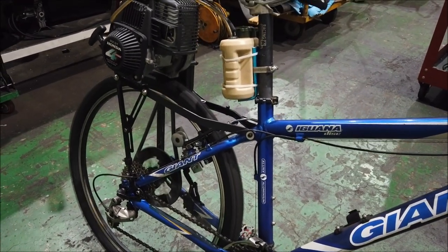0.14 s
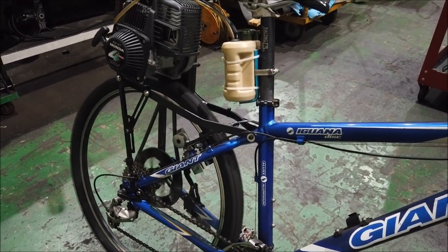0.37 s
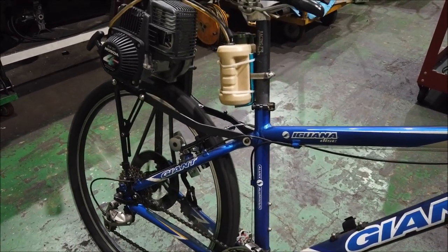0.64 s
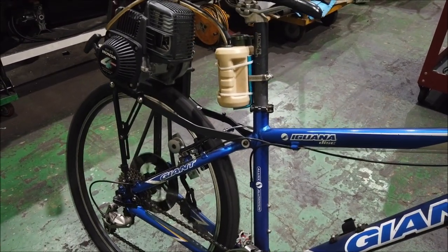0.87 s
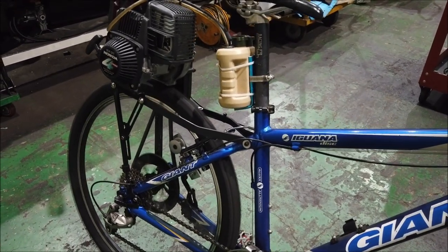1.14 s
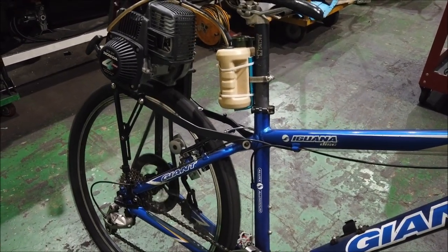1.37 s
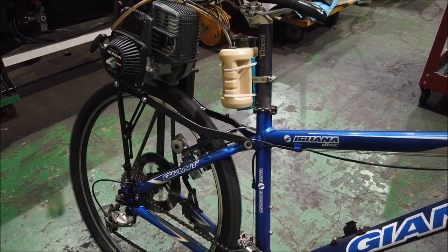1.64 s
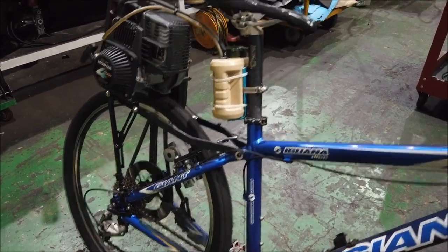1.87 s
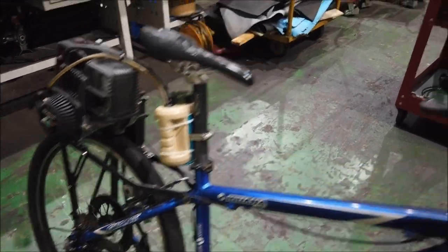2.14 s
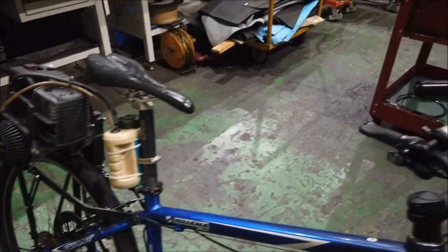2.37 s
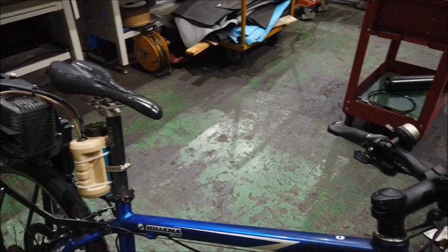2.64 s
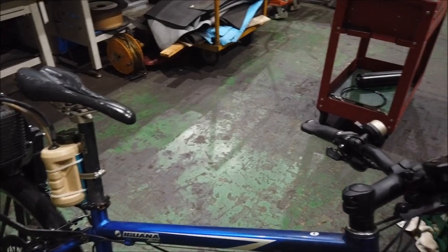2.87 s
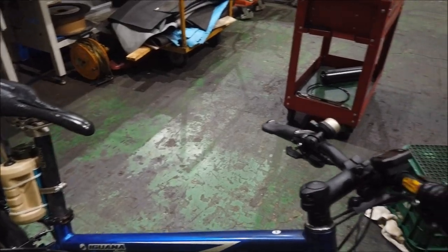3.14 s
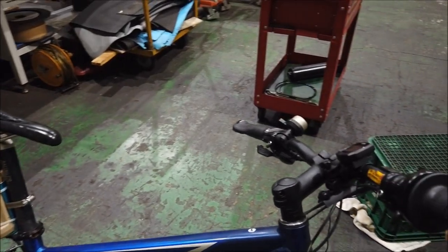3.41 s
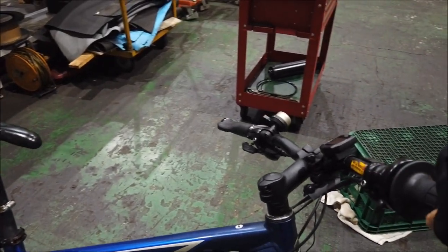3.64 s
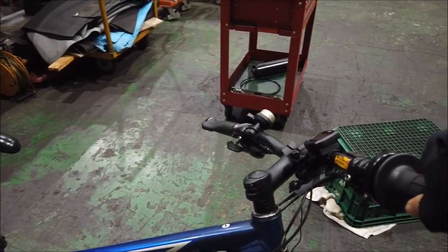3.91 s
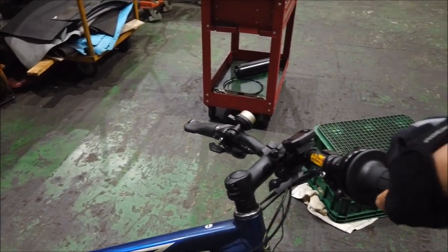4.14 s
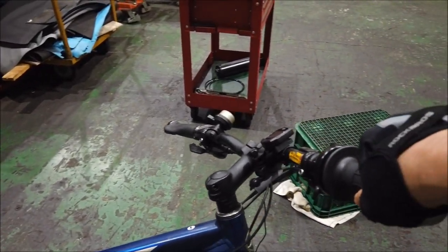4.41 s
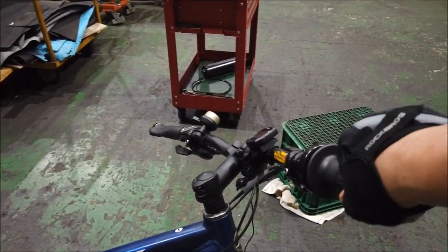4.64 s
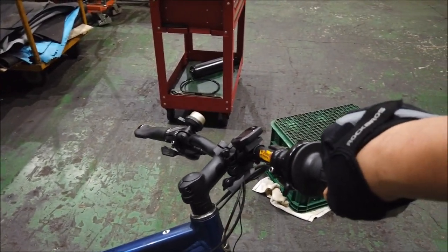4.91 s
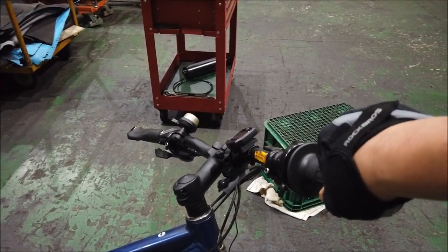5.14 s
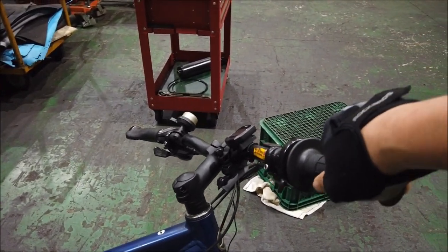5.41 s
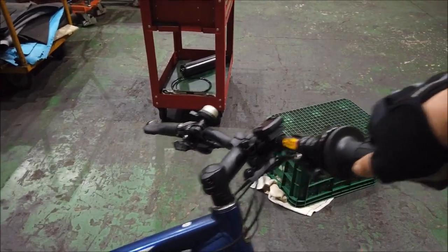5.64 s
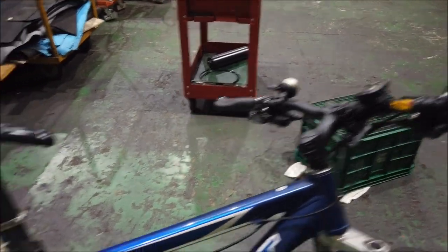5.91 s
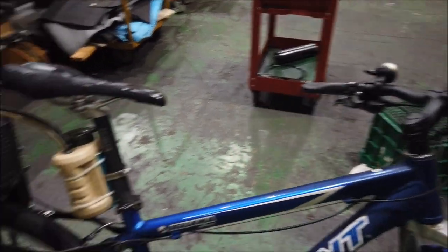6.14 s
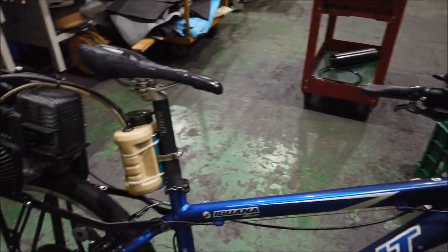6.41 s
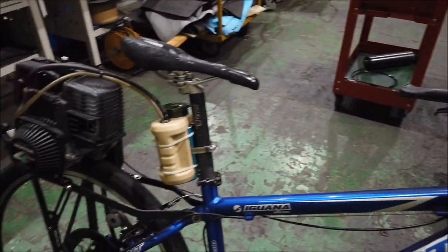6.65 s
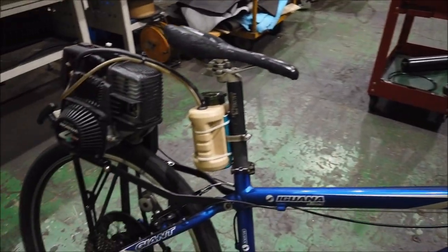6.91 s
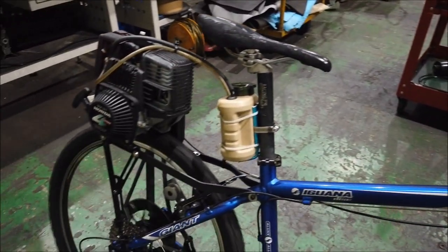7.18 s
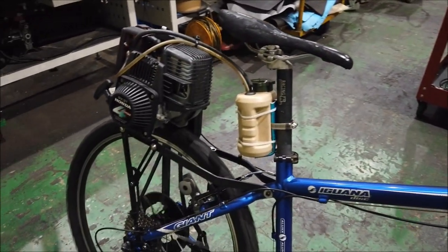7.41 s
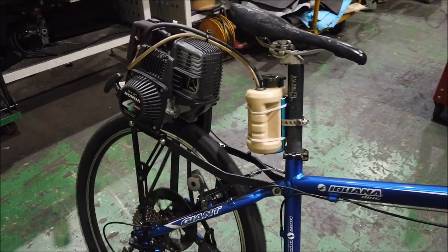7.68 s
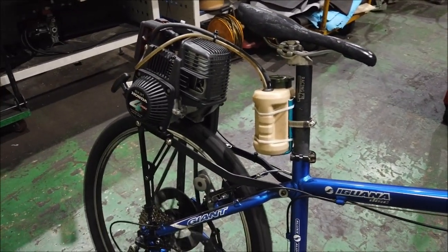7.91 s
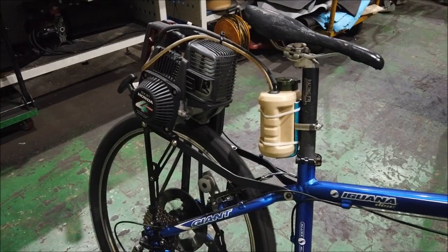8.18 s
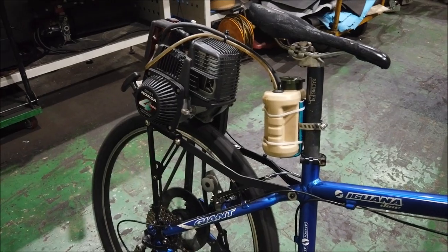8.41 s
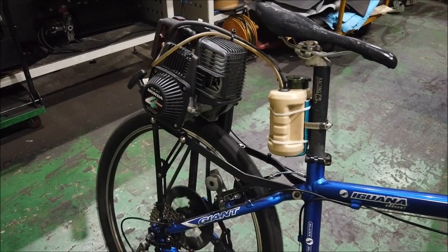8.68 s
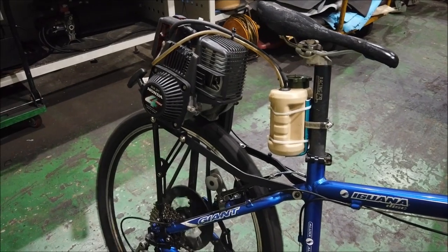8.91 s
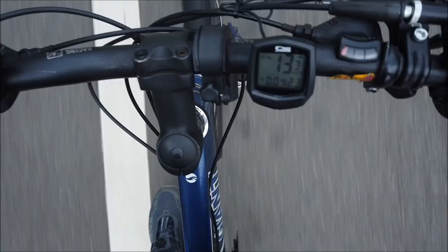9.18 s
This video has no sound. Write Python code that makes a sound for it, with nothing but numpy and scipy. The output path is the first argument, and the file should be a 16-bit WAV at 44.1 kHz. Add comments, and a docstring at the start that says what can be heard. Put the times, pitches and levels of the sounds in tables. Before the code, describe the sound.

A small two-stroke bicycle engine runs close to a hand-held stereo camera in a workshop. It begins mid-rev, dropping from about 0.2 s to a slow, lumpy idle near 0.7. A second rev starts around 0.9, peaks near 1.5 and falls to idle by 2.1. The camera turns away from 2.3, making the rattle more diffuse and roomy; a third, longer rev builds from 2.8 to 4.0, then sinks with a buzzing cover. A fourth rev runs from 4.7 to 5.4, then puttering idle until about 7.3, the camera back by 6.1. The fifth rev is loudest, with hard metallic knocks from 7.65 to 8.3, climbing steadily in pitch. Throughout, firing thuds underlie bright ticking, ringing metal, airy hiss and a faint wavering hum. At 9.26 it cuts instantly to a sliver of tyre and wind noise with a fast engine throb.

```python
"""The first rev of a small single-cylinder bicycle engine dies to idle beside a hand-held camera in a workshop;
more revs and idling follow as the camera turns away and back, up to the fifth and last rev.
Gas pulses (engine orders) thud under a clatter of ticks and hiss ringing valves, fins and shroud; a hum wavers.
The last instant cuts to the bicycle on a road: coloured noise with a firing throb."""
import sys
import numpy as np
from scipy import signal
from scipy.fft import rfft, irfft, next_fast_len
from scipy.io import wavfile
from scipy.ndimage import uniform_filter1d

SR = 44100
rng = np.random.default_rng(int(sys.argv[2]) if len(sys.argv) > 2 else 0)


def master_out(mix):
    """Clip the mix to full scale and print it as 16-bit PCM to the path in sys.argv[1]."""
    frames = np.transpose(np.atleast_2d(mix))
    ceiling = np.clip(frames, -1, 1)
    pcm = np.round(ceiling * 32767).astype(np.int16)
    wavfile.write(sys.argv[1], SR, pcm)


def undo_db(level):
    """Turn decibels back into plain size, where 20 dB means ten times bigger."""
    steps = np.asarray(level, float) / 20
    return 10 ** steps


N = 410130
STEP = 10  # samples between control values
T = np.arange(0, N, STEP) / SR  # control times, s
HZ = np.fft.rfftfreq(N, 1 / SR)
CRUISE_FIRING_HZ = 35  # speed at which levels are stated

# starts of four stretches (beside the engine, turned away, back at idle, back under throttle), then the end: time_s
STRETCH_EDGES_S = [0, 2.3, 6.12, 7.502, 9.3]
BLEND_S = 0.1  # half the crossfade of levels between stretches

# road noise colour: freq_hz, relative_density_db
ROAD_COLOUR = [(24, -24), (40, 6), (998, -11), (1560, -13), (1860, -16), (2710, -13), (3650, -20),
               (5050, -11), (11500, -17), (15500, -27)]
ROAD_DB, CUT_S = -39.5, 9.257

# left-right difference against the sum: freq_hz, level_db
SIDE_COLOUR = [(60, -34), (110, -22), (200, -28), (380, -20.5), (700, -19.5), (1290, -17), (2380, -11),
               (4400, -5.5), (8120, -2), (15000, -3.5)]
# delay that ripples the tie between the ports, per stretch: delay_s
PORT_DELAY_S = [.0004, 0, .0003, .0003]
# width of the low clatter, room's share when turned away, per stretch: level_db
WIDE_STRETCH_DB = [-5.5, 8.5, -5, -7]
WIDE_HZ = 2040  # widening fades above this
LEAN_DB = .11  # left port up, right port down

# engine speed: time_s, firing_hz
ENGINE_SPEED = [(0.0, 45.0), (0.18, 47.6), (0.36, 39.7), (0.62, 26.7), (0.75, 25.5), (0.88, 30.5),
                (1.01, 36.9), (1.08, 39.0), (1.27, 41.2), (1.44, 44.8), (1.54, 45.2), (1.68, 39.6),
                (1.81, 33.0), (1.99, 27.7), (2.15, 23.8), (2.45, 23.8), (2.6, 28.4), (2.8, 31.5),
                (2.98, 37.0), (3.39, 38.5), (3.7, 41.8), (3.93, 43.1), (4.02, 40.4), (4.3, 25.8),
                (4.61, 25.1), (4.8, 36.5), (5.09, 38.2), (5.43, 41.5), (5.54, 37.2), (5.7, 28.3),
                (5.83, 24.5), (6.6, 23.0), (7.3, 28.0), (7.43, 30.9), (7.59, 35.6), (7.75, 36.6),
                (8.39, 38.9), (8.75, 43.4), (8.99, 44.1), (9.3, 48.3)]
# twists of the grip: start_s, wide_open_s, let_go_s
GRIP_TWISTS = [(-.5, -.3, .18), (.78, 0.943, 1.57), (2.5, 2.874, 3.98), (4.55, 4.8, 5.43),
               (7.358, 7.485, 10.2)]
TWIST_POWER, SNAP_S = 2, 0.03  # opens slowly at first, springs shut
# how hard the mechanism works as heard at the camera: time_s, level_db
EFFORT_HEARD = [(0.0, -36.5), (0.2, -37), (0.85, -44.5), (1.0, -37.5), (1.52, -35.5), (1.91, -43),
                (2.11, -40.5), (2.21, -44.5), (2.39, -44.5), (2.7, -49.5), (2.81, -47), (2.93, -40),
                (3.27, -39), (3.97, -39.5), (4.48, -49), (4.74, -46.5), (4.82, -39.5), (5.36, -39.5),
                (5.72, -44), (6.1, -44.5), (6.9, -47), (7.39, -48), (7.52, -42), (7.66, -36), (8.0, -35.5),
                (8.71, -34.5), (9.25, -34)]
EFFORT_MID_DB = -40

# level of the hum at middle effort: time_s, level_db
HUM_HEARD = [(0, -57), (.7, -49.5), (1.1, -56.5), (2.05, -52.5), (2.65, -65), (3.4, -57.5), (4.3, -54.5),
             (4.9, -58), (5.6, -54), (6.3, -59.5), (7.5, -64.5), (9.2, -57)]
HUM_HZ, HUM_HZ_PER_FIRING_HZ, HUM_WIDTH_HZ = 627.8, 2.6, 85
WAVER_HZ, WAVER_DB, WAVER_S = 12, 1, .12
HUM_DB_PER_EFFORT_DB = 0.74

# firing evenness; rows idling, pulling, coasting: limp_cycles, jitter_cycles, strength_spread_db
FIRING_STATES = [(.02, .009, 1.5), (.001, .002, .8), (.004, .013, 1.5)]
# engine orders of the gas pulse at idle: firing_multiple, relative_db
IDLE_ORDERS = [(1, -21), (2, -4), (3, -1), (4, -4.5), (5, -1.5), (6, -2), (7, -0.5), (8, -2), (9, -8.5),
               (10, -5), (11, -8.5), (12, -9.5), (13, -21), (14, -14), (15, -14), (16, -24), (17, -25),
               (18, -13.5)]
# engine orders under throttle: firing_multiple, relative_db
PULL_ORDERS = [(1, -7), (2, 3), (3, -6), (4, -13), (5, 2.5), (6, -1.5), (7, -9), (8, -6), (9, -12),
               (10, -26), (11, -19), (12, -40), (13, -19), (14, -9), (15, -20), (16, -28), (17, -24),
               (18, -5)]
# engine orders under throttle from the handlebar side: firing_multiple, relative_db
PULL_AWAY_ORDERS = [(1, -6), (2, 2.5), (3, -6), (4, -14), (5, 3), (6, -2), (7, -7), (8, -1.5), (9, -6.5),
                    (10, -18), (11, -12), (12, -17), (13, -37), (14, -23), (15, -32), (16, -14.5),
                    (17, -22), (18, -17.5)]
# engine orders coasting down: firing_multiple, relative_db
COAST_ORDERS = [(1, -18), (2, 1.5), (3, 2), (4, -4), (5, -5), (6, -7.5), (7, -6.5), (8, -3.5), (9, -9.5),
                (10, -6), (11, -26), (12, -13), (13, -20), (14, -37), (15, -36), (16, -30), (17, -13),
                (18, -14)]
# gas pulses: grip shut at cruise speed, speed slope, added by the open grip
THUD_DB, THUD_DB_PER_FIRING_HZ, OPEN_DB = -51, 0.3, 3.5
GULP_DB, GAP_DB, SURGE_S = 0.5, -1.5, 0.048  # surge as the grip opens, dip as it shuts
# gas pulses per stretch: gain_db
THUD_STRETCH_GAIN_DB = [.3, 0.12, 0.24, 0.63]
RUSH_DB, SHUT_RUSH_DB, RUSH_HZ = -13.5, 2.5, 280  # against the pulses, extra when coasting, top

# resonances of the engine: part_index, centre_hz, width_hz, gain_db in each of four stretches (relative in a part)
PART_RINGS = [(0, 576, 186, 10.5, -4, 0.5, -2), (0, 494, 191, -30, -29, -2, -4.5),
              (0, 780, 222, 16, 6, -7, -6.5), (0, 1093, 211.4, -56, 1.5, -2, -1),
              (1, 1170, 196, -8, -4, -12, -8.5), (1, 1464, 132, -2.5, 0.5, -4, 0.5),
              (1, 1684, 77.4, -1, -3, -8, -3.5), (1, 1846, 66, -2, -0.5, -4.5, 1.5),
              (1, 2122, 119, -4, 0.5, -3.5, -1.5), (2, 2300, 200, -5.5, -3.5, -14, -9),
              (2, 2592, 66, -2.5, 1, 13.5, -0.5), (2, 2820, 87, -4.5, -2.5, 7, -3.5),
              (3, 3048, 157, -2, -3, 5, -3), (3, 3397, 152, -1.5, -4.5, 7, -3.5),
              (3, 3677, 154, -1.5, -2.5, 6, -4), (3, 4226, 400, -6, -1.5, 2.5, -7.5),
              (4, 4610, 132, -6.5, -0.5, -10, -6), (4, 4900, 96, -5.5, 1, -4.5, -4),
              (4, 5163, 98, -1, 2.5, 0, 0.5), (4, 5350, 89.5, -6.5, -1.5, -1.5, -4),
              (4, 5494, 92, -4, 1.5, -2, 4.5), (4, 5786, 89, -3, 2.5, -3, 1.5),
              (4, 6035, 98, -4.5, 1, -5, 1.5), (5, 6265, 120, -6, 0, -8, 1),
              (5, 6600, 90.5, -5, 0, -2, 6.5), (5, 6825, 90, -2, 3, -4, 1),
              (5, 7310, 413, -11, -3, -4, -3.5), (6, 7690, 885, -5, -0.5, -1, -3),
              (6, 8650, 533, -0.5, 3, 1, 0.5), (6, 9310, 500, -2, 1.5, -1, -0.5),
              (6, 10080, 756, -1, 2, 0.5, 0.5), (6, 11310, 1190, -4.5, -3, -3, -4),
              (6, 12640, 400, 1, 1.5, 2, 2), (6, 13220, 2440, -10.5, -8, -7.5, -10)]
# tank, case, cover, barrel, fins, shroud, fan hiss:
# level_db in each of four stretches (middle effort, cruise speed), slope_db_per_effort_db, slope_db_per_firing_hz
PART_LEVEL_ROWS = [(-55.5, -57.5, -55, -54.5, 0.33, 0.31), (-49.5, -51.5, -52.5, -54, 0.77, 0.19),
                   (-55, -54.5, -49.5, -54.5, 0.69, .03), (-49, -50.5, -49.5, -50, 0.86, .03),
                   (-43.5, -45, -40.5, -42, 1.09, 0.016), (-46, -46.5, -53, -50, 1.07, 0.025),
                   (-46, -43, -49.5, -48, 1.05, 0.012)]
# slow rise and fall of the low clatter (tank and case): time_s, gain_db
LOW_CLATTER_GAIN = [(0, 0.5), (.6, 0.8), (1.1, -0.5), (1.6, 0.2), (2.3, 0.2), (2.9, -1.5), (3.7, 1.7),
                    (4.2, 1.3), (4.75, -2.8), (5.3, 1.3), (5.9, 1.5), (6.4, -0.1), (7.3, -2), (7.8, -0.6),
                    (9.2, 1.9)]
# cover buzzes: centre_s, half_length_s, peak_db
COVER_BUZZES = [(4.47, 0.29, 3), (4.76, .06, 7), (4.85, 0.95, 3.5), (5.067, 0.21, 4), (6.86, .1, 6.5),
                (7.68, 0.045, 1)]
RASP_DB, RASP_LAG_S, RASP_S = 2, 0.062, 0.054  # barrel, just after the grip is wide open
# valve and piston ticks: phase_cycles, level_db
CRANK_TICKS = [(.02, 0), (.33, -8), (.58, -5), (.8, -7)]
# ticks' share of each part's drive power at cruise speed, the rest steady hiss: share
TICK_POWER_SHARE = [0.21, 0.21, 0.37, 0.046, 0.35, 0.23, 0.2]
# tick decay in each part: decay_s
TICK_DECAY_S = [0.0065, 0.0078, 0.0021, 0.0046, 0.0037, 0.0052, 0.0098]
HARDEST_TICK_DB = 11  # cap on the random size
# hard single knocks of the valve gear: time_s, db_above_clatter
VALVE_KNOCKS = [(7.653, 5), (7.678, 6), (7.7343, 8), (7.8121, 7), (7.8433, 7), (7.9558, 5), (8.0545, 7),
                (8.1087, 8), (8.2136, 4), (8.2894, 2.5)]


def evened(x):
    """Scales to rms 1."""
    return x / np.sqrt(np.mean(x ** 2) + 1e-20)


def columns(rows):
    """Each column of a time table at every control step."""
    s, *values = np.transpose(rows)
    return np.array([np.interp(T, s, v) for v in values])


def by_stretch(values):
    """One value per stretch, blended across each change."""
    times_s = np.repeat(STRETCH_EDGES_S[1:4], 2) + BLEND_S * np.tile([-1, 1], 3)
    return np.interp(T, times_s, np.repeat(values, 2)[1:-1])


def colour(points, hz):
    """Gain over frequency from (Hz, dB) points, on a log axis."""
    f, db = np.transpose(points)
    return undo_db(np.interp(np.log(hz + 1), np.log(f + 1), db))


def to_side(spectrum, other, hz, port_s):
    """The ports differ by a part in quadrature with the sum and by an unrelated part."""
    tied = .65 * np.cos(2 * np.pi * hz * port_s)
    return colour(SIDE_COLOUR, hz) * (-1j * tied * spectrum + np.sqrt(1 - tied ** 2) * other)


def road():
    """Firing throb, tyre and wind noise heard from the saddle: noise modulated at 85 Hz, then coloured."""
    throb = 1 + .5 * np.cos(2 * np.pi * 85 * np.arange(N) / SR)
    mid, other = rfft(throb * rng.standard_normal((2, N))) * colour(ROAD_COLOUR, HZ)
    noise = irfft([mid, to_side(mid, other, HZ, PORT_DELAY_S[0])], N)
    return undo_db(ROAD_DB) * noise / np.std(noise[0])


def effort():
    """Effort against its middle, dB."""
    return columns(EFFORT_HEARD)[0] - EFFORT_MID_DB


def hollow_hum(firing_hz):
    """Noise in a narrow wavering resonance that follows the revs a little."""
    knots_s = np.arange(0, T[-1] + 1, WAVER_S)
    bend, swell = (np.interp(T, knots_s, c) for c in rng.standard_normal((2, len(knots_s))))
    hz = HUM_HZ + HUM_HZ_PER_FIRING_HZ * (firing_hz - CRUISE_FIRING_HZ) + WAVER_HZ * bend
    level_db = columns(HUM_HEARD)[0] + HUM_DB_PER_EFFORT_DB * effort() + WAVER_DB * swell
    r = np.exp(-np.pi * HUM_WIDTH_HZ * STEP / SR)
    noise = [1, 1j] @ rng.standard_normal((2, len(T)))
    slow = signal.lfilter([1], [1, -2 * r, r ** 2], noise)
    carrier = np.exp(2j * np.pi * np.cumsum(hz) * STEP / SR)
    return undo_db(level_db) * evened((slow * carrier).real)


def throttle():
    """Opening of the twist grip, 0-1."""
    return sum(np.clip((T - start) / (full - start), 0, 1) ** TWIST_POWER * np.clip(1 - (T - shut) / SNAP_S, 0, 1)
               for start, full, shut in GRIP_TWISTS)


def thud_db(firing_hz, opened):
    """Gas pulses grow with speed and throttle, surge as the grip opens and falter as it shuts."""
    surge = lambda s: np.exp(-((T - s) / SURGE_S) ** 2)
    moves_db = sum(GULP_DB * surge(full) + GAP_DB * surge(shut + SNAP_S) for start, full, shut in GRIP_TWISTS)
    speed_db = THUD_DB_PER_FIRING_HZ * (firing_hz - CRUISE_FIRING_HZ)
    return THUD_DB + speed_db + OPEN_DB * opened + moves_db + by_stretch(THUD_STRETCH_GAIN_DB)


def causal(orders, size=64):
    """Complex engine orders of a pulse that starts sharply and rings out (minimum phase), power 1."""
    db = np.transpose(orders)[1]
    log_gain = np.log(undo_db(np.r_[db[0] - 12, db, np.full(size // 2 - len(db), db[-1] - 6)]))
    circle = np.r_[log_gain, log_gain[-2:0:-1]]
    z = np.exp(circle - 1j * signal.hilbert(circle).imag)[1:len(db) + 1]
    return z * np.sqrt(2) / np.linalg.norm(z)


def gas_pulses(opened, weights, turns):
    """Exhaust blow and intake gulp repeat each cycle as engine orders; throttle and speed set their shape."""
    limp, jitter, uneven_db = np.transpose(FIRING_STATES) @ weights
    chance = rng.standard_normal((int(turns[-1]) + 2, 2))
    wobble, strength = (np.interp(turns, np.arange(len(chance)), c) for c in chance.T)
    angle = 2 * np.pi * (turns + limp * np.cos(np.pi * turns) + jitter * wobble)

    away = np.interp(T, np.repeat(STRETCH_EDGES_S[1:3], 2) + [-.1, .1, -.1, .1], [0, 1, 1, 0])
    shares = [weights[0], opened * (1 - away), opened * away, weights[2]]
    shapes = [causal(o) for o in (IDLE_ORDERS, PULL_ORDERS, PULL_AWAY_ORDERS, COAST_ORDERS)]
    orders = np.transpose(shapes) @ shares
    multiples = np.arange(1, len(orders) + 1)[:, None]
    pulses = (orders * np.exp(1j * multiples * angle)).real.sum(0)

    # idle blows are soft, every second more so
    weak_db = -weights[0] * (5.2 + 4.3 * np.sin(angle / 4) ** 2) * np.cos(angle / 2) ** 12
    return undo_db(uneven_db * strength + weak_db) * pulses


def gas(firing_hz, turns):
    """Gas pulses and turbulent rush at control rate, joined by the hum and resampled to mid and side."""
    opened = np.clip(throttle(), 0, 1)
    fast = np.clip((firing_hz - 27) / 7, 0, 1)  # grip shut and fast: coasting
    weights = np.array([(1 - opened) * (1 - fast), opened, (1 - opened) * fast])
    pulses = gas_pulses(opened, weights, turns)
    lowpass = signal.butter(4, RUSH_HZ / (SR / STEP / 2))
    rush, draught = signal.lfilter(*lowpass, rng.standard_normal((2, len(T))))
    level_db = thud_db(firing_hz, opened)
    blow = pulses + undo_db(RUSH_DB + SHUT_RUSH_DB * weights[2]) * evened(rush)
    mid = rfft(undo_db(level_db) * blow + hollow_hum(firing_hz))
    other = rfft(undo_db(level_db - 18) * evened(draught))
    side = to_side(undo_db(-7) * mid, other, HZ[:len(mid)], 0)
    return STEP * irfft([mid, side], N)


def part_levels(firing_hz):
    """Each part follows effort and speed by its own amount and has its own level in each stretch."""
    effort_db = effort()
    buzz_db = sum(db * np.clip(1 - abs(T - s) / half, 0, 1) for s, half, db in COVER_BUZZES)
    rasp_db = sum(RASP_DB * np.exp(-((T - full - RASP_LAG_S) / RASP_S) ** 2) for start, full, shut in GRIP_TWISTS)
    low_db = columns(LOW_CLATTER_GAIN)[0]
    levels_db = []
    for part, row in enumerate(PART_LEVEL_ROWS):
        level_db = by_stretch(row[:4]) + row[4] * effort_db + row[5] * (firing_hz - CRUISE_FIRING_HZ)
        extra_db = (part == 2) * buzz_db + (part == 3) * rasp_db + (part < 2) * low_db
        levels_db.append(level_db + extra_db)
    return levels_db


def ringing(modes, hz):
    """Response of resonances, neighbours in opposite sign so that the valleys stay filled."""
    return sum((-1) ** k * undo_db(db) * 1j * w * hz / (f ** 2 - hz ** 2 + 1j * w * hz)
               for k, (f, w, db) in enumerate(modes))


def ring_parts(drive, part):
    """Rings one part with its resonances in each stretch, crossfaded, as mid and side."""
    out, fine_s = np.zeros((2, N)), np.arange(N) / SR
    for stretch, (start, end) in enumerate(zip(STRETCH_EDGES_S, STRETCH_EDGES_S[1:])):
        span = slice(max(round((start - .1) * SR), 0), round((end + .15) * SR))
        fade = np.interp(fine_s[span], [start - .1, start + 0.079, end - .1, end + 0.098],
                         [stretch == 0, 1, 1, end == STRETCH_EDGES_S[-1]])
        fft_size = next_fast_len(len(fade))
        hz = np.fft.rfftfreq(fft_size, 1 / SR)
        body = ringing([(row[1], row[2], row[3 + stretch]) for row in PART_RINGS if row[0] == part], hz)
        body = evened(abs(body)) / abs(body + 1e-20) * body
        mid, other = rfft(fade * drive[:, span], fft_size) * body
        wide = undo_db(WIDE_STRETCH_DB[stretch] / (1 + (hz / WIDE_HZ) ** 2))
        side = wide * to_side(mid, other, hz, PORT_DELAY_S[stretch])
        out[:, span] += irfft([mid, side], fft_size)[:, :len(fade)]
    return out


def patchy(x, patchy_db, size, drift_db, drift_size):
    """Lets short patches and slower drifts of the short-time spectrum swell and sink at random."""
    z = signal.stft(x, nperseg=512, noverlap=384)[2]

    def field(frames, bins):
        noise = rng.standard_normal(z.shape[:0:-1])
        return evened(uniform_filter1d(uniform_filter1d(noise, frames, 0), bins, 1)).T

    gain = undo_db(patchy_db * field(*size) + drift_db * field(*drift_size))
    return signal.istft(z * gain, nperseg=512, noverlap=384)[1][:, :N]


def clatter(firing_hz, turns):
    """Ticks near fixed crank angles, each of its own size, knocks and steady hiss ring the engine's parts."""
    cycle, out = turns.astype(int), np.zeros((2, N))
    knocks = sum(undo_db(db) * np.exp(-np.maximum(T - s, 0) / 0.0045) * (T >= s) for s, db in VALVE_KNOCKS)
    blow = rng.exponential(1, (cycle[-1] + 2, len(CRANK_TICKS)))  # felt by all parts
    late_cycles = rng.normal(0, 0.016, blow.shape)
    # only in the idle after the third stretch begins
    idle = np.clip((30 - firing_hz) / 4, 0, 1) * (T > STRETCH_EDGES_S[2])
    for part, level_db in enumerate(part_levels(firing_hz)):
        # ticks stand out more at low speed
        share = np.clip(TICK_POWER_SHARE[part] * CRUISE_FIRING_HZ / firing_hz, 0, 1)
        size_db = 3.0 * blow + 1.73 * rng.exponential(1, blow.shape)
        size = undo_db(np.minimum(size_db, HARDEST_TICK_DB))
        ticks = 0
        for k, (phase, db) in enumerate(CRANK_TICKS):
            since_s = (turns % 1 - phase - late_cycles[cycle, k]) / firing_hz
            decay = np.exp(-np.maximum(since_s, 0) / TICK_DECAY_S[part]) * (since_s > 0)
            ticks = ticks + undo_db(db) * size[cycle, k] * decay
        # strong idle blows spit at the outlet
        puffs = (part == 6) * undo_db(8) * idle * np.exp(-(turns % 2) / firing_hz / 0.0033)
        hit = (2 < part < 6) * knocks
        gate = np.sqrt(puffs ** 2 + 1 - share + share * evened(ticks) ** 2 + hit ** 2)
        drive = np.repeat(undo_db(level_db) * gate, STEP) * rng.standard_normal((2, N))
        out += ring_parts(drive, part)
    return patchy(out, patchy_db=1.5, size=(12, 2), drift_db=1.1, drift_size=(90, 4))


def scene():
    """Mid and side of workshop, then road, turned into left and right."""
    firing_hz = columns(ENGINE_SPEED)[0]
    turns = np.cumsum(firing_hz) * STEP / SR + .83  # firing cycles
    cut = np.clip((np.arange(N) / SR - CUT_S) / 0.0021, 0, 1)
    engine = clatter(firing_hz, turns) + gas(firing_hz, turns)
    mid, side = (1 - cut) * engine + cut * road()
    return np.array([mid + side, mid - side])


def low_pass(x):
    """Removes everything above the highest recorded frequency."""
    return signal.sosfilt(signal.butter(12, 16270, fs=SR, output="sos"), x)


def record(dry):
    """The camera's two ports, the left slightly more sensitive."""
    mix = dry * undo_db(np.array([[LEAN_DB], [-LEAN_DB]]))
    return low_pass(mix)


dry = scene()
out = record(dry)
master_out(out)
```